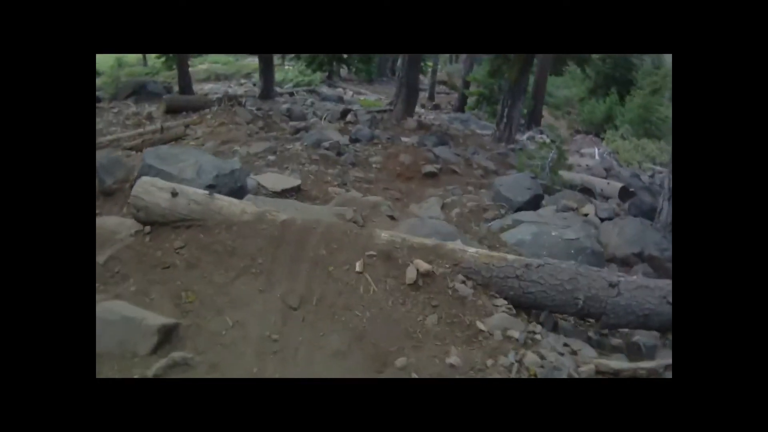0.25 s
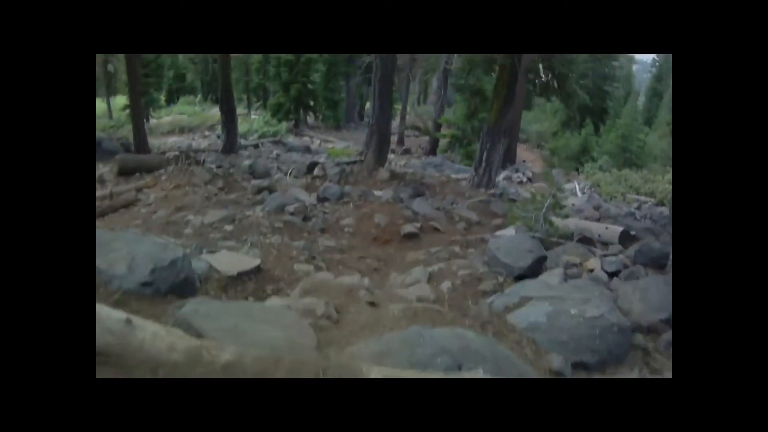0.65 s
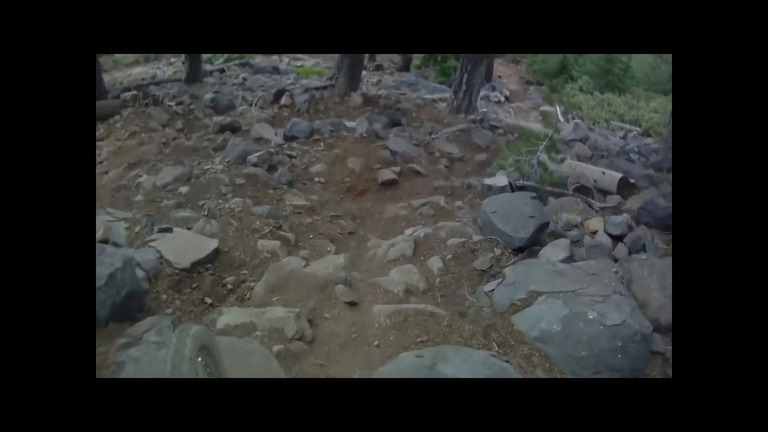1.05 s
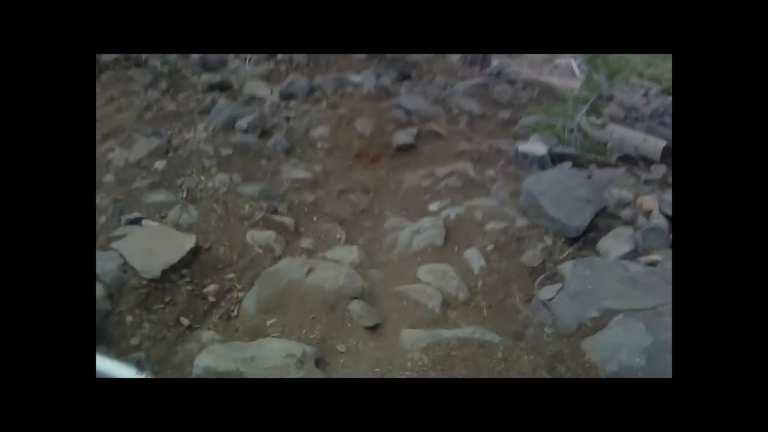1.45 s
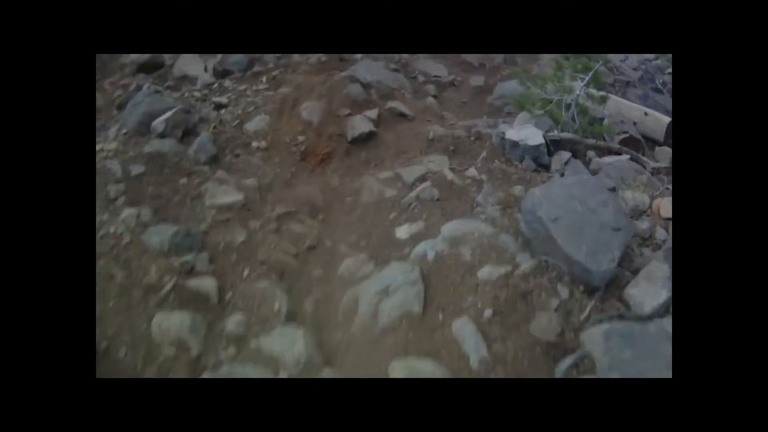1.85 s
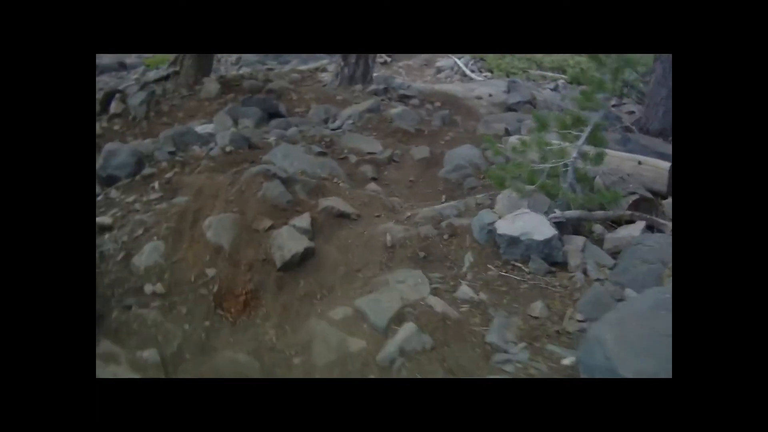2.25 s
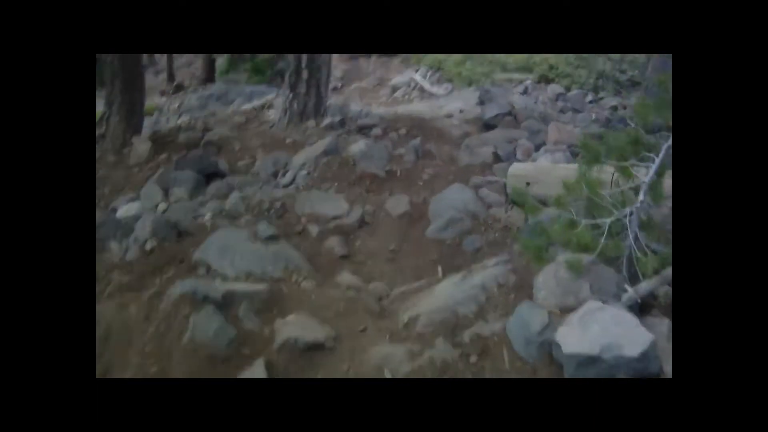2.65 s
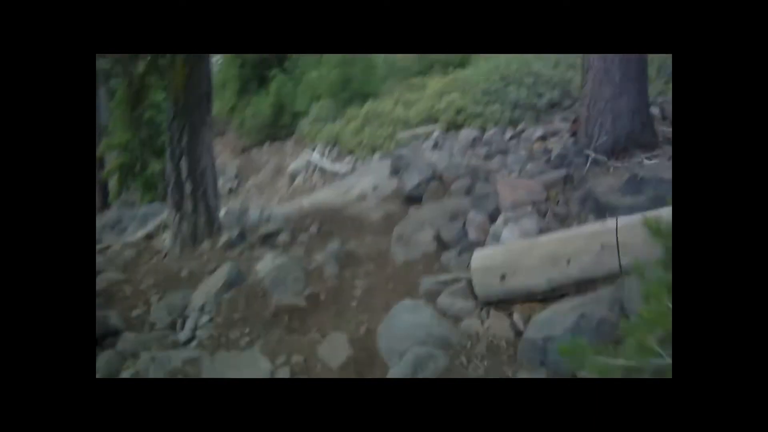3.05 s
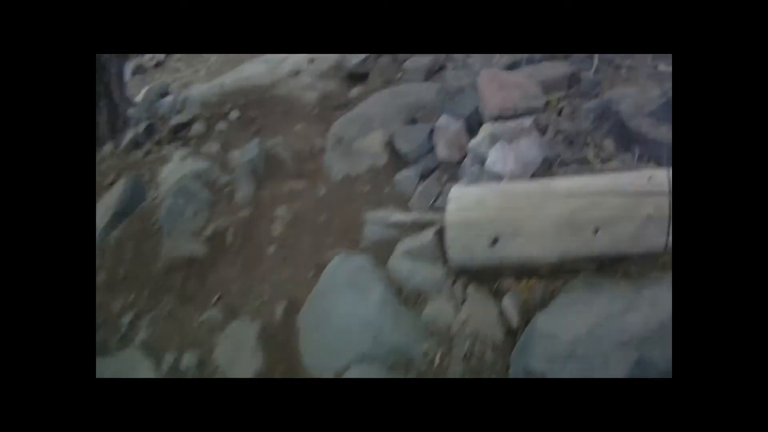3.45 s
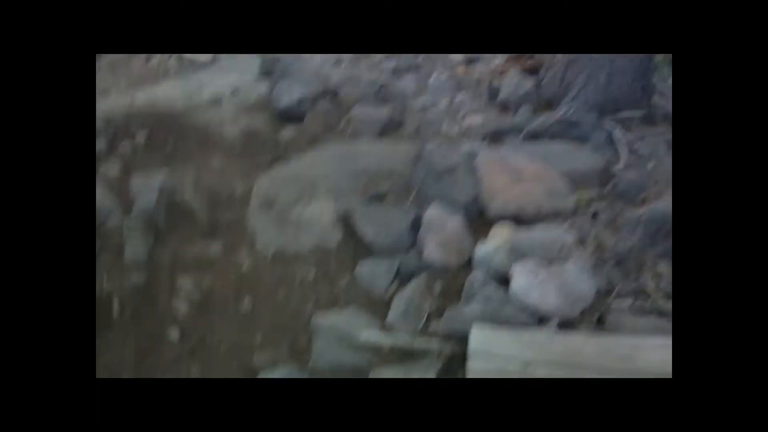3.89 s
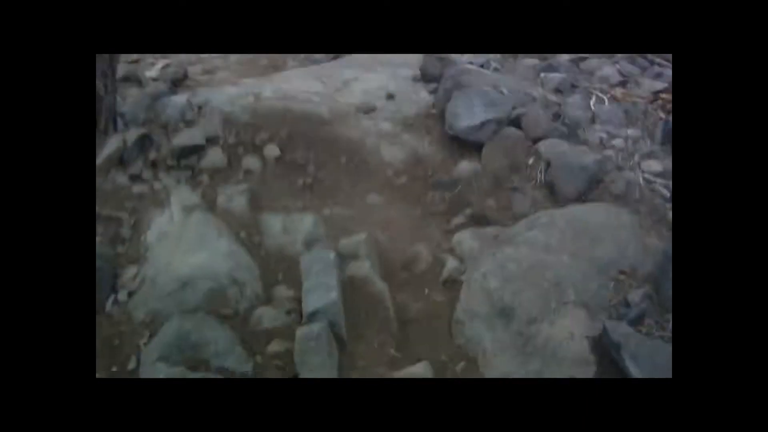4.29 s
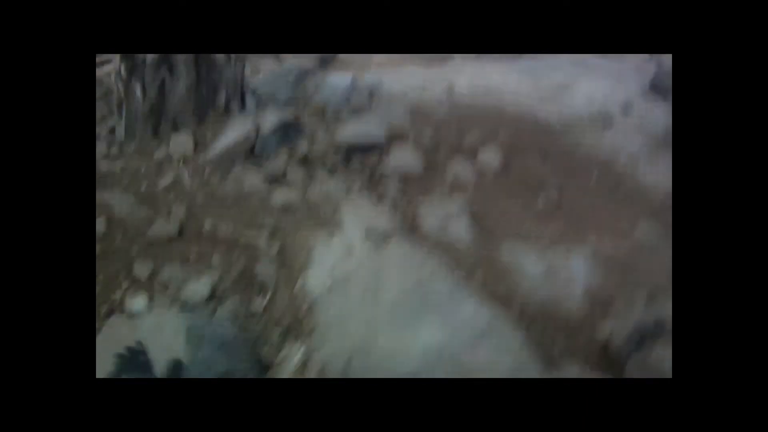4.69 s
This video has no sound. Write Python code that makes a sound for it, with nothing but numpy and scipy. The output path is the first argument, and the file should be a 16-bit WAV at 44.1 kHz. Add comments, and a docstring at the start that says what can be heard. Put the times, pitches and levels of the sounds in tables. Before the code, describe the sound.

Hard dry clacks punctuate quiet tyre rumble and crackling grit as a bike descends stones, ending in a dense burst of thumps and crunching.

```python
"""Knocks of chain, frame and stones ring briefly in a camera's housing as its wearer rides a rocky trail.
Each knock is an impulse with chatter, filtered by damped housing modes; rattles, crunching stones and
pebbles send smaller contacts through the same modes, and cloth swishes as dense slips. Tyres thump as
damped modes and roll as shaped noise and clicks. Brakes and rubber add faint wavering tones, over hiss."""
import sys
import numpy as np
from scipy import signal
from scipy.fft import rfft, irfft
from scipy.io import wavfile
from scipy.ndimage import map_coordinates

SR = 44100
rng = np.random.default_rng(int(sys.argv[2]) if len(sys.argv) > 2 else 0)


def transcribe(u):
    """Save the signal u as a 16-bit wav file named by the first command-line argument.

    u: samples, shape (n,) or (channels, n), limited to [-1, 1]; the rate is SR.
    q: integer samples, one column per channel.
    """
    v = np.clip(np.atleast_2d(u).T, -1, 1)
    q = np.round(v * 32767).astype(np.int16)
    wavfile.write(sys.argv[1], SR, q)


N = 213003

# Sharp knocks. Each row: start in seconds, blow level in dB, weight (bass shelf) in dB, edge (treble slope,
# in dB per quarter decade), ring of the struck part in Hz, level of the rattle it shakes loose in dB.
KNOCKS = [(0.4773, 2.5, -6, -17.5, 9300, -43), (0.5429, -16.5, 9, -24, 920, -60.5),
          (0.7318, -26.5, 18.5, -7, 2770, -67), (1.6005, 3, -4.5, -13, 8400, -81),
          (1.7484, -21.5, 10.5, -17, 720, -91), (1.8097, -16, 0.5, -8, 7450, -50.5),
          (2.152, -33, -16, -4, 3470, -89), (2.235, -20, 12, -2, 4270, -64),
          (2.3424, -2.5, -2.5, -14.5, 367, -56), (2.4453, -13, -26, -25, 394, -49.5),
          (2.7832, -29, 20, 1, 3280, -65), (3.0956, -11.5, 15, -10, 6500, -53),
          (3.1424, -14, 7, -9.5, 1020, -47.5), (3.195, 10.5, -0.5, -10, 10000, -45),
          (3.5503, -13, 19.5, -3.5, 6160, -45), (3.8469, -19.5, -50, -7, 6300, -56),
          (3.955, -0.5, 1.5, -22, 806, -72), (4.0216, -10, 6, -15, 635, -89),
          (4.0537, -16, 9, -17.5, 805, -84.5), (4.067, -24, 9, -31, 887, -87),
          (4.2488, -39, 31, -15, 670, -79), (4.4912, -20.5, -5, -2.5, 4200, -55.5),
          (4.625, -12, 1.5, -8, 730, -45.5), (4.788, -9.5, 21, -21, 880, -49),
          (4.8063, -10, 5, -21, 804, -65), (4.8094, -5, 4, -7, 796, -52.5)]
# Rolling over dirt. Each row: time in seconds, tyre rumble in dB, grit in dB, both before fixed offsets.
ROLLING = [(0.0, -62.5, -66), (0.34, -66.5, -70.5), (0.6, -60.5, -62), (0.74, -63, -76.5), (1.03, -75, -73),
           (1.21, -67.5, -77.5), (1.4, -63.5, -69), (1.64, -67, -72), (2.0, -60, -63.5),
           (2.62, -61.5, -65.5), (3.0, -61.5, -64.5), (3.52, -65.5, -67), (3.89, -59, -63.5),
           (4.02, -78, -80.5), (4.14, -67, -73.5), (4.3, -62.5, -64), (4.69, -53, -61.5),
           (4.83, -58.5, -53.5)]


def amp(db):
    """Decibels are logarithmic: 20 dB is a factor of ten in amplitude."""
    return 10 ** (np.asarray(db) / 20)


def evened(x):
    """Normalises the mean power, so that the rms is 1."""
    return x / np.sqrt(np.mean(x ** 2) + 1e-20)


def add(mix, s, sound):
    """Superposition: adds a sound to the mix from s seconds on."""
    part = mix[max(round(s * SR), 0):][:len(sound)]
    part += sound[:len(part)]


def coloured(x, points):
    """Linear filtering: multiplies the spectrum by a curve of (Hz, dB) points, then sets rms 1."""
    hz, db = np.transpose(points)
    log_hz = np.log(np.fft.rfftfreq(len(x), 1 / SR) + 1)
    gain = amp(np.interp(log_hz, np.log(hz + 1), db))
    return evened(irfft(rfft(x) * gain, len(x)))


def wander(size, rate):
    """Band-limited chance: a smooth curve through random values, rms near 1, about rate turns a second."""
    at = np.arange(size) * 2 * rate / SR
    return map_coordinates(rng.standard_normal(N // 64), [at], order=2, mode="mirror")


def grains(size, per_s, spread_db):
    """Shot noise: random clicks, most small and a few large unless spread_db is 0, at rms 1."""
    chance = rng.random(size)
    height = np.minimum(rng.exponential(1, size), 4)
    sign = rng.choice([-1, 1], size)
    return evened((chance < per_s / SR) * sign * amp(spread_db * height))


def housing(weight_db, edge_db, ring_hz=1000, ring_db=0, uneven_db=2, size=4096):
    """Modal impulse response: a contact excites damped housing modes, with its own bass, treble and ring."""
    # Housing resonances. Each row: frequency in Hz, bandwidth in Hz, mode level in dB.
    modes = [(332, 75, -6.5), (522, 140, -3), (678, 63, -9), (1003, 59, -8.5), (1253, 64, -6),
             (1546, 120, -11), (1790, 500, -11), (2596, 180, -6), (3027, 334, 3.5), (3966, 260, -6),
             (4470, 110, -2.5), (5800, 1300, -18.5), (6500, 570, -6), (7850, 9100, -14), (12000, 670, -9.5)]
    t = np.arange(size // 2) / SR
    ring = np.zeros(len(t))
    for mode_hz, width, db in modes:
        # every place of contact favours other modes
        level = amp(db + uneven_db * (2 * rng.random() - 1))
        ring += level * width * np.exp(-np.pi * width * t) * np.cos(2 * np.pi * mode_hz * t)

    hz = abs(np.fft.fftfreq(size, 1 / SR)) + 1
    bass_hz, treble_hz, lowest_hz = 1040, 4630, 270
    ring_width = 0.27  # in natural log of frequency
    travel_s = 0.000897  # delay of a bending wave at bass_hz
    force_db = weight_db / (1 + (hz / bass_hz) ** 2)
    force_db += edge_db * np.log10(1 + (hz / treble_hz) ** 4)
    force_db += ring_db / (1 + (np.log(hz / ring_hz) / ring_width) ** 2)
    force_db -= 10 * np.log10(1 + (lowest_hz / hz) ** 4)
    # minimum phase: the response starts at the contact, not before
    causal = np.exp(np.conj(signal.hilbert(np.log(amp(force_db)))))
    # dispersion: bending waves carry the treble to the microphone ahead of the bass
    spread = np.exp(-4j * np.pi * travel_s * np.sqrt(bass_hz * hz))
    response = (causal * spread)[:size // 2 + 1]
    return irfft(rfft(ring / np.linalg.norm(ring), size) * response, size)[:size // 2]


def cluster(length, weight_db, edge_db, fade, per_s=1500, spread_db=4.5, jostle_db=4, count=3):
    """Granular contact: a few stones or links, each with its own colour, jostle together and weaken."""
    size = max(int(length * SR), 64)
    shape = np.exp(-fade * np.linspace(0, 1, size)) * signal.windows.tukey(size, .1)
    forces = []
    for _ in range(count):
        contacts = grains(SR // 8, per_s, spread_db)[:size]
        forces.append(contacts * shape * amp(jostle_db * wander(size, rate=70)))
    out = 0
    for force in evened(np.array(forces)):
        out = out + signal.fftconvolve(force, housing(weight_db, edge_db, uneven_db=7.5))
    return out / np.sqrt(count)


def knocks(chatter_db=-13, skid=0.3, chatter_t60=0.026, tail_db=-28, tail_t60=0.079, ring_db=9):
    """Impulsive excitation: one hard blow, brief contact chatter, then a faint shiver of loose parts."""
    out, t = np.zeros(N), np.arange(4000) / SR
    for s, db, weight_db, edge_db, ring_hz, _ in KNOCKS:
        decay = amp(-60 * t / np.array([[chatter_t60], [tail_t60]]))
        chatter, tail = rng.standard_normal((2, len(t))) * decay
        # firm blows land cleanly, light ones skid
        force = amp(chatter_db - skid * db) * chatter / np.linalg.norm(chatter)
        force += amp(tail_db) * tail / np.linalg.norm(tail)
        force[0] += 1
        force /= np.linalg.norm(force)
        add(out, s, amp(db) * signal.fftconvolve(force, housing(weight_db, edge_db, ring_hz, ring_db)))
    return out


def rattles():
    """Repeated small impacts: chain and cables rattle from the moment of each knock."""
    out = np.zeros(N)
    for s, *_, db in KNOCKS:
        add(out, s, amp(db) * cluster(length=0.032, weight_db=7, edge_db=-8.5, fade=0.97))
    return out


def crunches(fade=0.62):
    """Granular friction: stones grind against each other as a tyre rolls over them."""
    # Each row: start in seconds, length in seconds, force level in dB, weight (bass shelf) in dB,
    # edge (treble slope) in dB per quarter decade.
    grinds = [(0.407, 0.0096, -52, -25, -6.5), (0.434, 0.058, -55, 5, -17), (0.586, 0.017, -44.5, 1.5, -25),
              (0.756, 0.04, -71, 23, -3.5), (1.413, 0.012, -50.5, 1.5, -8.5),
              (1.433, 0.0087, -53.5, -2, -8.5), (1.949, 0.014, -49, 4, -15), (2.811, 0.03, -47, 4, -20),
              (2.876, 0.013, -44.5, -48, -19), (3.086, 0.021, -43, 1, -4), (3.356, 0.025, -48.5, -37, -26),
              (3.533, 0.017, -55.5, 14, -5), (3.588, 0.0274, -47.5, 9.5, -12), (3.7, 0.013, -43, -21, -8),
              (3.901, 0.044, -48.5, -3, -2.5), (4.354, 0.0065, -45.5, -17, -12.5),
              (4.53, 0.025, -40.5, -8, -17.5), (4.573, 0.044, -44, -6, -3.5),
              (4.674, 0.0096, -33, -18, -20.5), (4.76, 0.025, -44.5, 15.5, -3),
              (4.799, 0.014, -33, 14.5, -31)]
    out = np.zeros(N)
    for s, length, db, weight_db, edge_db in grinds:
        add(out, s, amp(db) * cluster(length, weight_db, edge_db, fade))
    return out


def thumps(level_db=-3, pitch_spread=.06):
    """Damped modal vibration: a soft blow and its rebound swing tyre and frame, and scuff the grit."""
    # Each row: start in seconds, level in dB (the swing adds level_db, the scuff scuff_db), pitch in Hz.
    landings = [(0.21, -35, 400), (2.422, -33.5, 523), (2.642, -31, 513), (3.092, -20.5, 382),
                (3.21, -28.5, 384), (3.294, -35.5, 425), (3.443, -27, 298), (3.55, -25, 374),
                (3.888, -29, 490), (4.249, -31.5, 424), (4.409, -24, 522), (4.455, -24.5, 413),
                (4.529, -24, 582), (4.662, -18, 613), (4.764, -39, 444), (4.777, -34, 53),
                (4.787, -26, 540), (4.803, -23.5, 610)]
    cycles = 14  # swings at the main pitch until a thump has died by 60 dB
    rebound_s, rebound_db = .011, -9.5  # the tyre lands a second time, more softly
    scuff_db = -33.5
    modes = [(.2, -13), (.7, -9), (1, -2), (1.42, -8), (2.1, -18)]  # (ratio to the pitch, dB)
    out, t = np.zeros(N), np.arange(5000) / SR
    for s, db, hz in landings:
        soft_onset = 1 - np.exp(-t * hz * 2)
        swing = amp(db + level_db - 60 * t * hz / cycles) * soft_onset
        for delay, blow_db in [(0, 0), (rebound_s, rebound_db)]:
            ring = np.zeros(len(t))
            for ratio, mode_db in modes:
                mode_hz = hz * ratio * (1 + pitch_spread * rng.uniform(-1, 1))
                ring += amp(mode_db) * np.cos(2 * np.pi * mode_hz * t)
            add(out, s + delay, amp(blow_db) * swing * ring)
        scuff = cluster(length=0.018, weight_db=15, edge_db=-13.5, fade=0.96)
        add(out, s, amp(db + scuff_db) * scuff)
    return out


def swishes(per_s=5000, catch_db=2.0, level_db=1, hollow_hz=2200, hollow_db=-4):
    """Dry friction: dense slips of cloth near the camera, strongest past the middle of each stroke."""
    # Each row: start in seconds, length in seconds, force level in dB before level_db,
    # weight (bass shelf) in dB, edge (treble slope) in dB per quarter decade.
    strokes = [(0.653, 0.058, -44, -32, -12), (0.883, 0.083, -62, -6, -11.5),
               (1.019, 0.11, -48.5, -12, -17), (1.183, 0.085, -44, -26, -15),
               (1.236, 0.077, -43, -7, -13.5), (1.326, 0.071, -59.5, 9, -8.5), (1.77, 0.062, -50, 3, 1),
               (2.263, 0.057, -55.5, 2, -8.5)]
    lateness = 1.73  # above 1 the swell peaks late
    out = np.zeros(N)
    for s, length, db, weight_db, edge_db in strokes:
        u = np.linspace(0, 1, max(int(length * SR), 64))
        swell = np.sqrt(abs(np.sin(np.pi * u ** lateness))) * signal.windows.tukey(len(u), .6)
        slips = grains(SR, per_s, spread_db=0.0)[:len(u)]
        catching = amp(catch_db * wander(len(u), rate=172.0))
        force = evened(slips * swell * catching)
        response = housing(weight_db, edge_db, hollow_hz, hollow_db, uneven_db=3)
        add(out, s, amp(db + level_db) * signal.fftconvolve(force, response))
    return out


def stick_slip(notes, waver, waver_hz, flutter_db, rise_per_s=0):
    """Stick-slip friction: surfaces catch and let go in an unsteady tone that may climb with pressure."""
    out = np.zeros(N)
    for s, length, hz, db in notes:
        size = int(length * SR)
        climb = rise_per_s * (np.arange(size) / SR - length / 2)
        turns = np.cumsum(hz * (1 + climb + waver * wander(size, waver_hz))) / SR
        flutter = amp(flutter_db * wander(size, waver_hz))
        tone = np.sin(2 * np.pi * turns) * flutter * signal.windows.tukey(size, .5)
        add(out, s, amp(db) * evened(tone))
    return out


def moans():
    """Stick-slip at low pitch: the brakes moan, climbing as the pressure grows."""
    # Each row: start in seconds, length in seconds, middle pitch in Hz, rms dB ahead of the microphone.
    notes = [(.35, 0.15, 490, -64), (1.72, 0.14, 451, -58.5), (3.445, 0.061, 531, -52.5)]
    return stick_slip(notes, waver=.025, waver_hz=300, flutter_db=2.5, rise_per_s=.6)


def singing():
    """Stick-slip at very high pitch: a brake disc sings with a slight pitch waver."""
    # Each row: start in seconds, length in seconds, pitch in Hz, rms dB ahead of the microphone.
    notes = [(2.09, 0.13, 15000, -71), (2.37, 0.2, 15060, -53)]
    return stick_slip(notes, waver=.007, waver_hz=150, flutter_db=4.0)


def squeaks():
    """Stick-slip with a strong pitch waver: rubber squeaks on rock."""
    # Each row: start in seconds, length in seconds, pitch in Hz, rms dB ahead of the microphone.
    notes = [(0.162, 0.03, 1100, -72.5), (0.742, 0.042, 896, -61), (1.01, 0.035, 703, -63),
             (3.26, 0.053, 2490, -62), (3.365, 0.027, 2420, -59.5)]
    return stick_slip(notes, waver=.08, waver_hz=400, flutter_db=3)


def rolling(rumble_db=2.0, grit_db=-2, lumps_db=3.0, clumps_db=2, patch_db=4.5):
    """Modulated noise: tyres rumble over lumps and crush grit, each stone size in its own band and clumps."""
    # Spectrum of tyres on the ground. Each row: frequency in Hz, relative level in dB per Hz.
    rumble_spectrum = [(15, -27.5), (35, -0.5), (90, -4.5), (200, -2.5), (400, 0), (560, -1.5), (750, -4),
                       (1100, -20.5), (2000, -22), (4000, -70.5)]
    # Spectrum of crushed grit. Each row: frequency in Hz, relative level in dB per Hz.
    grit_spectrum = [(600, -29.5), (1000, -19.5), (1800, -5.5), (2600, 6), (3100, -3), (3600, -7),
                     (4300, -3.5), (5400, -22.5), (6800, -5.5), (8000, -26.5), (11000, -19.5),
                     (15000, -28.5)]
    s, rumble_level, grit_level = np.transpose(ROLLING)
    t = np.arange(N) / SR
    lumps = wander(N, rate=34)
    rumble = coloured(rng.standard_normal(N) * amp(lumps_db * lumps), rumble_spectrum)

    edges, stones = np.geomspace(700, 16000, 11), np.zeros(N)
    for band in zip(edges, edges[1:]):
        clicks = grains(N, per_s=2500, spread_db=4.0) * amp(patch_db * wander(N, rate=23))
        stones += signal.sosfilt(signal.butter(2, band, "band", fs=SR, output="sos"), clicks)
    # grit partly follows the same lumps as the rumble
    clumps = wander(N, rate=30) + .5 * lumps
    grit = coloured(stones * amp(clumps_db * clumps), grit_spectrum)

    rumble_gain = amp(rumble_db + np.interp(t, s, rumble_level))
    grit_gain = amp(grit_db + np.interp(t, s, grit_level))
    return rumble * rumble_gain + grit * grit_gain


def pebbles(weight_db=6, edge_db=-5):
    """Random impacts: flicked pebbles skitter, each with its own ring, louder where more grit is crushed."""
    per_s, low_hz, high_hz = 60, 1700, 7500
    loudest_db, spread_db = 25, 9  # loudest relative to the grit column, and range below it
    ring_db, skitter_t60 = 14, .035
    out, t = np.zeros(N), np.arange(1500) / SR
    times, _, grit_level = np.transpose(ROLLING)
    for when, heft, pitch in rng.random((int(per_s * N / SR), 3)):
        s = when * N / SR
        hz = low_hz * (high_hz / low_hz) ** pitch
        force = rng.standard_normal(len(t)) * amp(-60 * t / skitter_t60)
        db = np.interp(s, times, grit_level) + loudest_db + spread_db * (heft ** 2 - 1)
        ring = housing(weight_db, edge_db, hz, ring_db, uneven_db=6)
        add(out, s, amp(db) * signal.fftconvolve(force / np.linalg.norm(force), ring))
    return out


def air(level_db=-73):
    """Stationary noise: a faint steady rush of air and microphone hiss, weakest near 7 kHz, some hiss above."""
    spectrum = [(30, -3.5), (150, -2.0), (700, -6), (2000, -12.5), (7000, -32.0), (14000, -15.5)]  # (Hz, dB)
    return amp(level_db) * coloured(rng.standard_normal(N), spectrum)


def scene():
    """Superposition: knocks and scrapes over the rolling bed, with the tones of brakes and rubber."""
    blows = knocks() + rattles() + crunches() + thumps()
    tones = moans() + singing() + squeaks()
    bed = rolling() + pebbles() + air()
    return (blows + swishes() + tones + bed)[None]


def record(dry, low_cut_hz=40, dull_hz=11500, edge_hz=15800):
    """Band-pass filtering: the small covered microphone sheds deep bass and top treble; then a band limit."""
    thin = signal.sosfilt(signal.butter(1, low_cut_hz, "high", fs=SR, output="sos"), dry)
    dull = signal.sosfilt(signal.butter(3, dull_hz, fs=SR, output="sos"), thin)
    band_limit = signal.firwin(255, edge_hz, window=("kaiser", 9), fs=SR)
    return signal.oaconvolve(dull, band_limit[None], "same")


dry = scene()
out = record(dry)
transcribe(out)
```